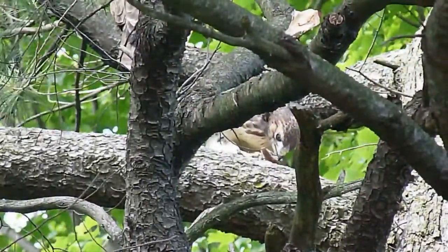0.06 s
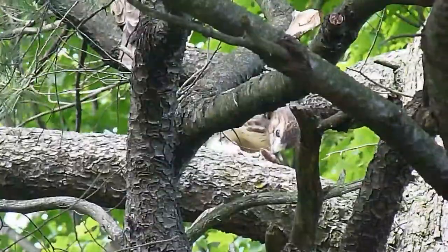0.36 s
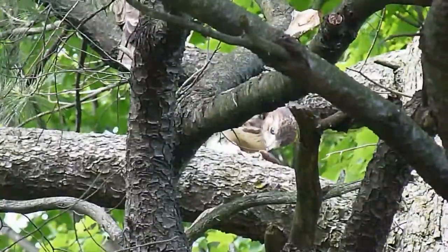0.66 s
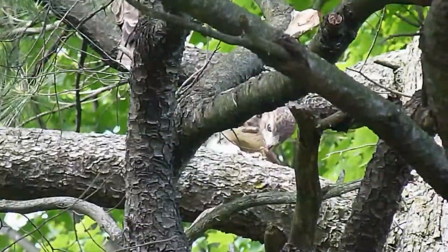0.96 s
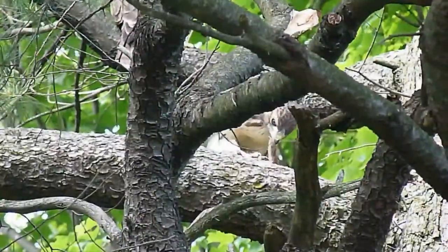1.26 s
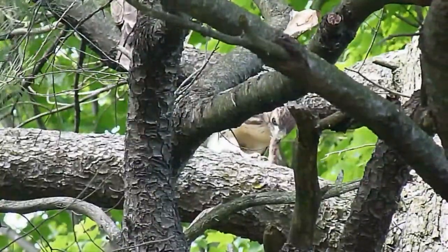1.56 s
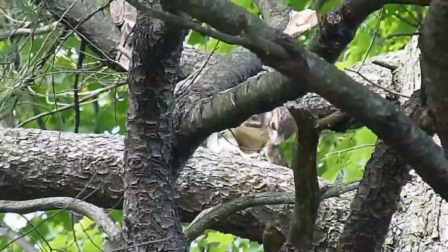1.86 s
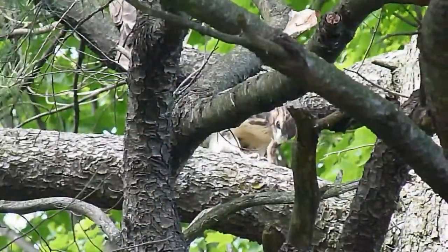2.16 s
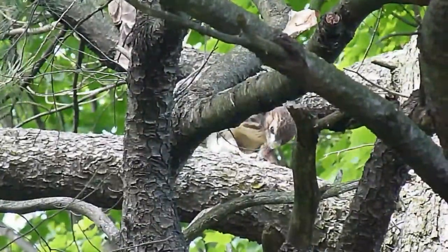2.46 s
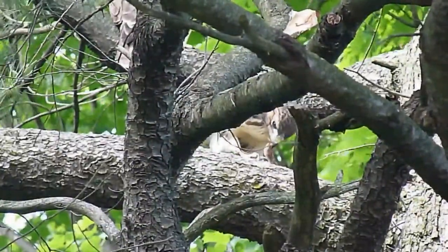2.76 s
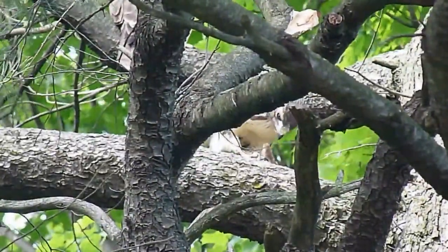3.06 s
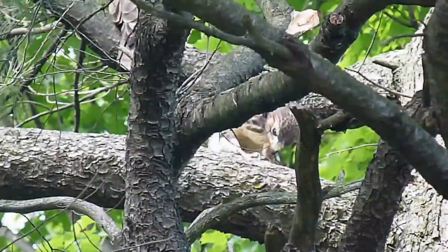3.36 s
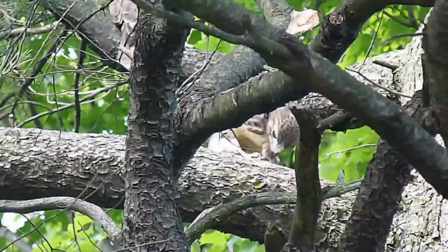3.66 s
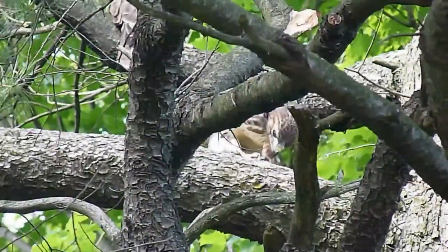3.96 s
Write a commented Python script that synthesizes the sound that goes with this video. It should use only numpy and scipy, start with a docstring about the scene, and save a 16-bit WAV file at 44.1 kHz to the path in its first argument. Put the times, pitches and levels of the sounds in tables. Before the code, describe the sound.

A young hawk gives two high begging whistles from a tree, each sliding up, holding and dropping away with a light garden echo. A few dull knocks and a rustling scuff follow, over faint hiss and far traffic.

```python
"""A young hawk in a tree gives two begging whistles. Each slides up in a low voice, breaks into a high
held note and drops back in a short falling tail. Trunks and garden walls echo the calls.
Behind them are a distant motor hum, far traffic and a soft hiss.
Near the end come a few dull knocks and a brief scuff that trails off as a rustle."""
import sys
import numpy as np
from scipy import signal
from scipy.fft import rfft, irfft, next_fast_len
from scipy.io import wavfile
from scipy.ndimage import map_coordinates

SR = 44100
rng = np.random.default_rng(int(sys.argv[2]) if len(sys.argv) > 2 else 0)


def store_pcm(level_fs):
    """Save levels as 16-bit WAV."""
    pcm = np.round(np.clip(level_fs, -1, 1) * 32767).astype(np.int16)
    wavfile.write(sys.argv[1], SR, np.atleast_2d(pcm).T)


N = 176400  # 4 seconds

# How alike a noise is in both ears. Each row: frequency in Hz, likeness (1 means the same).
EAR_LIKENESS = [(30, 0.99), (100, 1), (300, 1), (600, 0.94), (1200, 0.66), (2500, 0.1), (5000, .35),
                (7300, .6)]
# The motor's tones. Each row: pitch in Hz, level in dB.
MOTOR_TONES = [(77.5, -63.5), (117.3, -57), (140, -68.5)]
# The tone colour of the traffic and the hiss. Each row: frequency in Hz, relative level in dB.
TRAFFIC_SPECTRUM = [(15, -47), (25, -26.5), (64, -6.5), (86, -7), (118, -5.5), (140, -1.5), (209, -4),
                    (267, -1), (340, -4.5), (412, -4), (457, -5), (659, -9), (784, -8.5), (901, -10.5),
                    (1600, -18.5), (2080, -35), (3520, -120)]
HISS_SPECTRUM = [(880, -28), (1500, -6), (1920, -2), (2550, -0.5), (2880, -1), (4760, 0.5), (6030, -2),
                 (6680, -6.5), (7150, -3.5), (7600, -12.5), (9880, -32), (16700, -120)]
# A drone in the traffic. Each row: time in seconds, level in dB.
DRONE_LEVEL = [(0, -56), (.7, -53), (1.6, -53.5), (3, -64.5), (4, -75)]
# Steady, narrow bands of noise. Each row: centre in Hz, width in Hz, level in dB.
RINGING_BANDS = [(409, 16, -58.5), (776, 27, -65.5), (1240, 7.9, -76), (7260, 49, -68)]
# The low slides that open and close each call, one list per slide.
# Each row: time in seconds, pitch in Hz, relative level in dB.
LOW_SLIDES = [
    [(1.53, 1646, -55), (1.575, 1860, -47), (1.61, 1984, -44), (1.64, 2024, -46), (1.695, 2085, -44),
     (1.715, 2143, -62), (1.745, 2230, -46.5)],
    [(2.172, 2235, -54), (2.192, 2073, -42.5), (2.215, 1818, -53)],
    [(2.86, 1675, -52.5), (2.89, 1900, -45.5), (2.925, 2094, -41.5), (2.96, 2124, -52), (3.015, 2210, -48)],
    [(3.385, 2340, -49.5), (3.408, 2082, -40.5), (3.425, 1890, -51.5)],
]
# The high note, one list per call. Each row: time in seconds, pitch in Hz.
WHISTLE_PITCH = [
    [(1.765, 2710), (1.782, 2860), (1.83, 2855), (1.856, 2941), (1.93, 2930), (1.98, 2945), (2.03, 2969),
     (2.07, 2950), (2.125, 2935), (2.155, 2850), (2.175, 2860)],
    [(3.015, 2750), (3.046, 3002), (3.11, 3018), (3.14, 3060), (3.16, 3120), (3.21, 3103), (3.246, 3096),
     (3.29, 3070), (3.325, 3115), (3.358, 3057), (3.382, 2750)],
]
# Its loudness, one list per call. Each row: time in seconds, relative level in dB.
WHISTLE_LEVEL = [
    [(1.76, -47), (1.774, -50), (1.812, -44.5), (1.832, -56), (1.856, -39), (1.93, -39), (1.99, -45.5),
     (2.002, -41.5), (2.036, -44), (2.05, -53), (2.066, -40.5), (2.122, -37), (2.136, -47.5), (2.17, -42.5),
     (2.18, -52)],
    [(3.015, -55), (3.053, -34.5), (3.081, -36), (3.137, -36), (3.155, -42), (3.175, -35), (3.197, -37),
     (3.207, -46.5), (3.247, -34.5), (3.291, -47), (3.303, -51), (3.317, -48), (3.331, -36), (3.345, -47.5),
     (3.355, -34), (3.385, -57)],
]
# The voice's overtone, an octave up. Each row: its frequency in Hz, level in dB against the main tone.
OVERTONE_LEVEL = [(3300, -21.5), (3800, -10), (4150, -6.5), (4500, -13), (5800, -23), (6300, -24)]
# The knocks. Each row: start in seconds, level in dB.
KNOCKS = [(3.675, -34), (3.72, -43), (3.729, -27.5), (3.816, -39), (3.876, -31.5)]
# The tones in a knock. Each row: pitch in Hz, relative level in dB, seconds to fade by 60 dB.
KNOCK_TONES = [(308, 1.5, 0.025), (830, -5, 0.022), (1250, -4, 0.026)]
# The tone colour of the scuff and the rustle. Each row: frequency in Hz, relative level in dB.
SCUFF_SPECTRUM = [(290, -51), (500, -51), (608, -18.5), (899, 3.5), (1050, -7.5), (1220, -1), (2430, -14),
                  (2930, -10.5), (3500, -28), (4550, -49), (7700, -120)]
RUSTLE_SPECTRUM = [(150, -37), (300, -5), (850, -4.5), (1600, -15), (2800, -12), (4100, -7.5), (5500, -12),
                   (7000, -24), (10000, -38)]
# Their loudness. Each row: time in seconds, level in dB.
SCUFF_LEVEL = [(3.66, -70), (3.68, -56), (3.70, -51.5), (3.725, -45), (3.765, -49), (3.815, -44),
               (3.87, -48.5), (3.91, -57), (4, -59)]
RUSTLE_LEVEL = [(3.66, -73), (3.78, -60), (3.89, -49), (4, -50.5)]
# Filters for the treble and for its mirror image. Each row: frequency in Hz, gain in dB.
TREBLE_CUT = [(7400, 0), (7650, -10), (7850, -50)]
MIRROR_GAIN = [(8300, 2.5), (8750, -6), (9500, -12.5), (10200, -18.5), (11000, -31)]

TIME = np.arange(N) / SR  # seconds
SIDES = np.array([[1], [-1]])  # plus for the left ear, minus for the right


def amp(db):
    """Turn decibels into a number to multiply by."""
    return 10 ** (np.asarray(db) / 20)


def unit(x):
    """Scale a signal to an average (rms) level of 1."""
    return x / np.sqrt(np.mean(x ** 2) + 1e-20)


def along(rows, hz):
    """Read a table at any frequency, blending between rows on a log scale."""
    freqs, values = np.transpose(rows)
    return np.interp(np.log(hz + 1), np.log(freqs + 1), values)


def curves(rows):
    """Turn each column after the time into one value per sample."""
    times, *columns = np.transpose(rows)
    return [np.interp(TIME, times, column) for column in columns]


def wobble(rate):
    """A smooth curve through `rate` random values a second."""
    return map_coordinates(rng.standard_normal(4096), [TIME * rate], mode="wrap")


def filtered(x, response):
    """Multiply each frequency in x by response(hz)."""
    size = next_fast_len(N + SR // 2)
    return irfft(rfft(x, size) * response(np.fft.rfftfreq(size, 1 / SR)), size)[..., :N]


def stereo_noise(gain):
    """Noise shaped by gain(hz), with nearly the same bass in both ears."""
    def response(hz):
        spread = np.arccos(np.clip(along(EAR_LIKENESS, hz), -1, 1)) / 2
        return gain(hz) * [np.cos(spread), np.sin(spread)]
    mid, side = filtered(rng.standard_normal((2, N)), response)
    return unit(np.array([mid + side, mid - side]))


def broad_noise(spectrum):
    """Noise with the tone colour of a table."""
    return stereo_noise(lambda hz: amp(along(spectrum, hz)))


def narrow_noise(centre_hz, width_hz):
    """Noise that rings around one pitch."""
    return stereo_noise(lambda hz: 1 / (1 + ((hz - centre_hz) / width_hz) ** 2))


def motor_hum(wander_hz=1.65, swing_db=1):
    """A distant motor: low tones that waver in pitch and loudness."""
    hum = np.zeros(N)
    for hz, db in MOTOR_TONES:
        peak = np.sqrt(2) * amp(db + swing_db * wobble(6))
        phase = 2 * np.pi * np.cumsum(hz + wander_hz * wobble(12)) / SR
        hum += peak * np.sin(phase)
    return hum


def far_traffic(rumble_db=-48):
    """Far traffic rumbles evenly, with a drone in it that swells a little and fades."""
    rumble = amp(rumble_db + 0.2 * wobble(7.13)) * broad_noise(TRAFFIC_SPECTRUM)
    drone = amp(curves(DRONE_LEVEL)[0]) * narrow_noise(centre_hz=273, width_hz=26)
    return rumble + drone


def soft_hiss(hiss_db=-51.5):
    """An even hiss, with a few faint pitches ringing steadily."""
    ringing = sum(amp(db) * narrow_noise(hz, width) for hz, width, db in RINGING_BANDS)
    return ringing + amp(hiss_db + 0.083 * wobble(9.7)) * broad_noise(HISS_SPECTRUM)


def hawk_note(rows, hz, db, jitter, left_db, fade_s=0.0049, drift_db=1.05, flutter_db=1.5):
    """A whistled tone and one overtone. Jitter is how much the pitch shakes, as a share of it."""
    start, end = rows[0][0], rows[-1][0]
    fade = np.clip(np.minimum(TIME - start, end - TIME) / fade_s + .5, 0, 1)
    phase = 2 * np.pi * np.cumsum(hz * (1 + jitter * wobble(350))) / SR
    # Paths through the branches make phase and loudness drift between the ears.
    shift = SIDES * .4 * wobble(18)
    lean_db = SIDES * (left_db + drift_db * wobble(18))
    overtone = amp(along(OVERTONE_LEVEL, 2 * hz)) * np.sin(2 * phase + shift)
    peak = np.sqrt(2) * amp(db + lean_db + flutter_db * wobble(110))
    return fade * peak * (np.sin(phase + shift) + overtone)


def hawk(low_gain_db=-0.1, high_gain_db=-0.25, rasp_s=0.014):
    """The voice flips between low slides and a high, nearly pure whistle, rasping at the breaks."""
    slides = sum(hawk_note(rows, *curves(rows), jitter=.008, left_db=0.5) for rows in LOW_SLIDES)
    whistles = np.zeros((2, N))
    for pitch, level in zip(WHISTLE_PITCH, WHISTLE_LEVEL):
        from_break_s = np.minimum(abs(TIME - pitch[0][0]), abs(TIME - pitch[-1][0]))
        jitter = 0.0015 + 0.036 * np.exp(-from_break_s / rasp_s)
        whistles += hawk_note(pitch, *curves(pitch), *curves(level), jitter, left_db=1.5)
    return amp(low_gain_db) * slides + amp(high_gain_db) * whistles


def garden_echo(voice, echo_db=-10, build_s=.035, fade_s=.9):
    """The voice plus a blurred echo that builds up among trunks and walls, then dies away."""
    t = np.arange(SR) / SR
    envelope = (1 - np.exp(-t / build_s)) * amp(-60 * t / fade_s)
    tail = rng.standard_normal((2, SR)) * envelope
    echo = amp(echo_db) * tail / np.linalg.norm(tail[0])
    return voice + signal.fftconvolve(voice, echo, axes=1)[:, :N]


def scuff_and_rustle():
    """A rough scuff of noise gives way to a brighter rustle."""
    scuff = amp(curves(SCUFF_LEVEL)[0] + 0.77 * wobble(130)) * broad_noise(SCUFF_SPECTRUM)
    rustle = amp(curves(RUSTLE_LEVEL)[0]) * broad_noise(RUSTLE_SPECTRUM)
    return scuff + rustle


def dull_knocks(attack_s=0.0017):
    """Each knock sets off three tones that die almost at once."""
    knocks = np.zeros(N)
    for start, knock_db in KNOCKS:
        age = np.maximum(TIME - start, 0)
        attack = 1 - np.exp(-age / attack_s)
        for hz, tone_db, fade_s in KNOCK_TONES:
            fallen_db = 60 * np.minimum(age / fade_s, 2)
            knocks += attack * amp(knock_db + tone_db - fallen_db) * np.sin(2 * np.pi * hz * age)
    return knocks


def scene(left_lead_s=3e-5):
    """The hawk in its garden. All the other sounds reach the left ear slightly early."""
    calls = garden_echo(hawk())
    others = motor_hum() + far_traffic() + soft_hiss() + scuff_and_rustle() + dull_knocks()
    return calls + filtered(others, lambda hz: np.exp(1j * np.pi * hz * left_lead_s * SIDES))


def record(dry, low_rate_hz=16000, top_hz=11200):
    """A low sample rate cuts off the treble and leaves a faint mirror image above the cut."""
    dulled = filtered(dry, lambda hz: amp(along(TREBLE_CUT, hz)))
    mirror = 2 * np.cos(2 * np.pi * low_rate_hz * TIME) * dulled
    mirror = filtered(mirror, lambda hz: amp(along(MIRROR_GAIN, hz)))
    return filtered(dulled + mirror, lambda hz: hz < top_hz)


dry = scene()
out = record(dry)
store_pcm(out)
```